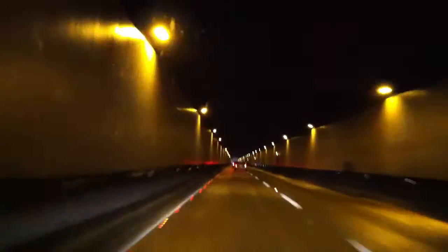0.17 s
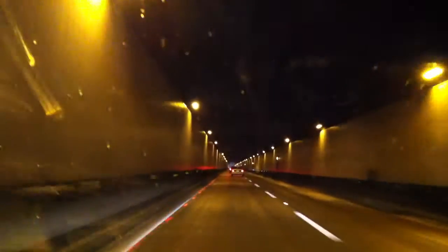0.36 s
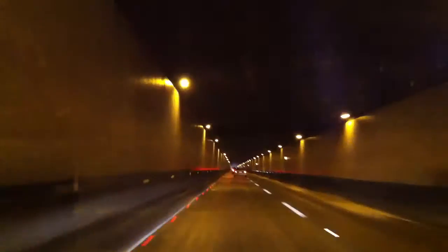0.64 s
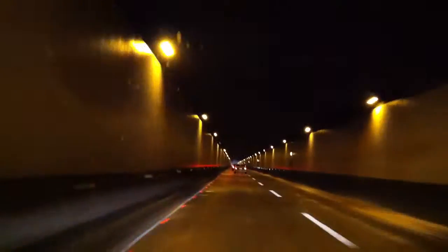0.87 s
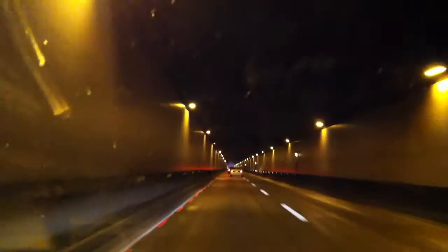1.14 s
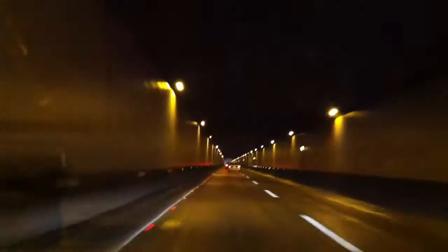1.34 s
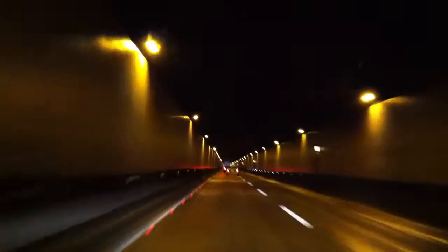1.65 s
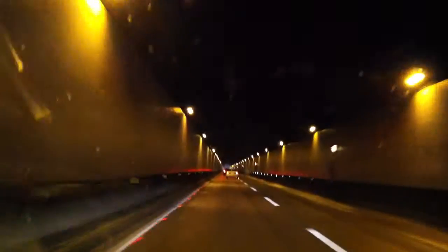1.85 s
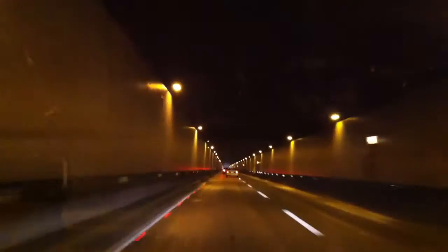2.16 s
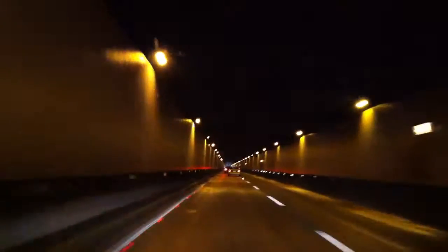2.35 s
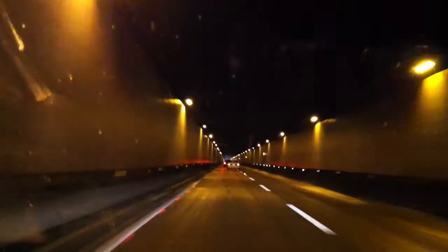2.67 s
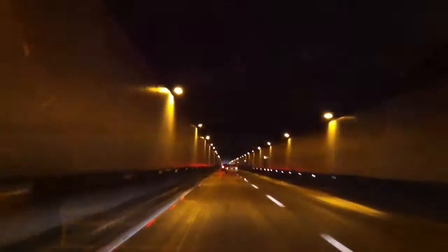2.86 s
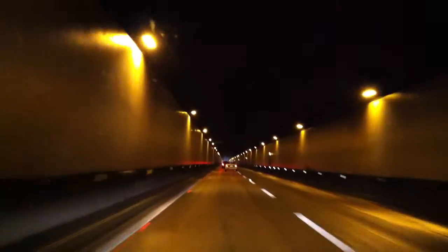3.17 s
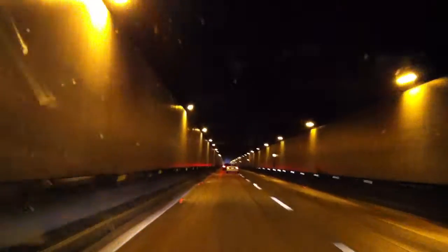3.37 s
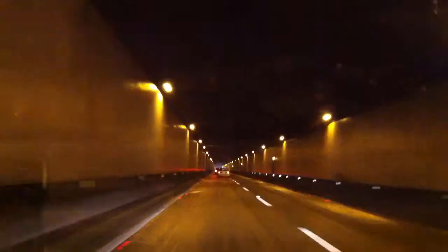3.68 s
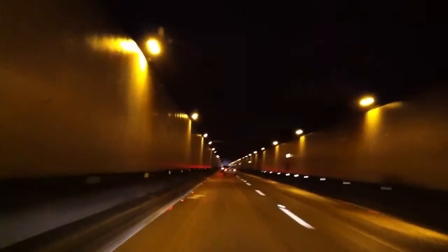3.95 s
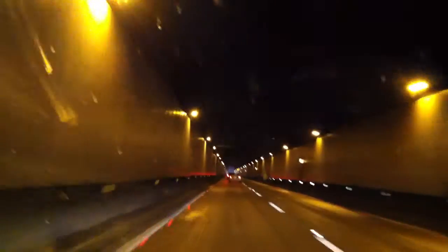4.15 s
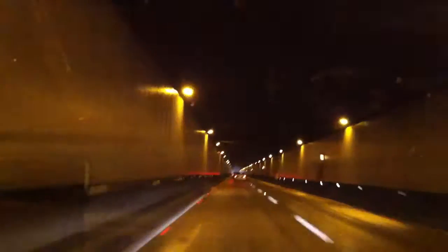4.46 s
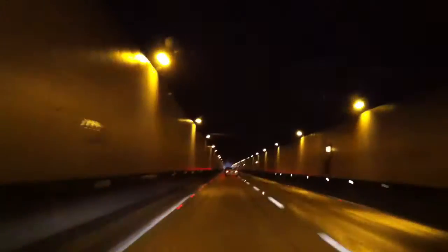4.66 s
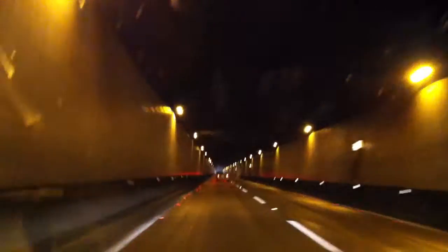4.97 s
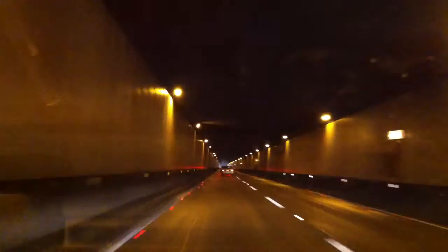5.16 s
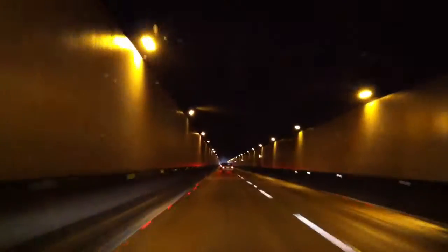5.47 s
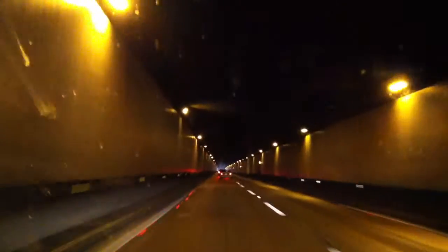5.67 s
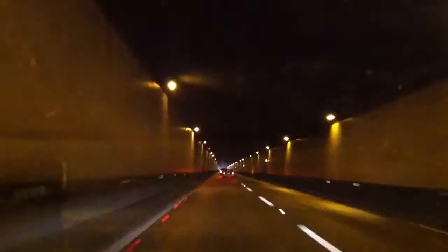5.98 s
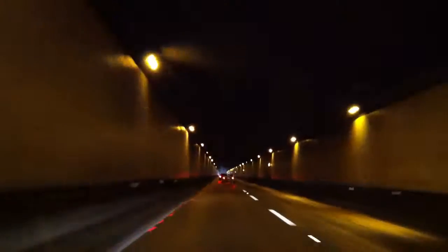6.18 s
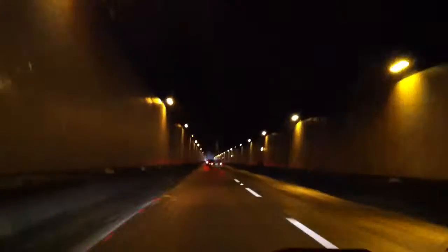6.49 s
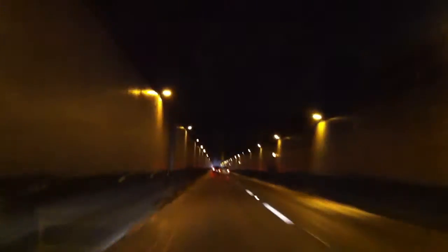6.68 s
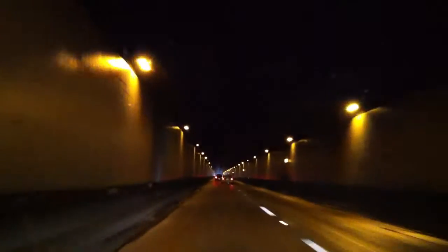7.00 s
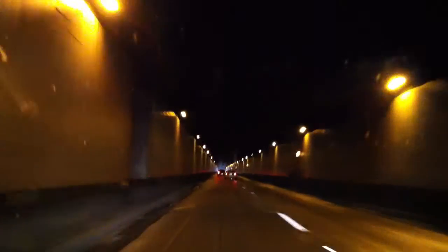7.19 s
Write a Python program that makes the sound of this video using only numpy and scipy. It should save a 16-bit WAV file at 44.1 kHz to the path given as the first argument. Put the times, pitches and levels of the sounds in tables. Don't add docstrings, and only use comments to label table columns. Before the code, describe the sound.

The inside of a car at steady speed in a road tunnel, captured close by a small microphone with little very deep bass. From the start a continuous low boom around 110 to 180 hertz fluctuates quickly with the road texture, blended with engine hum, rumble and muffled tyre roar. A faint, shaky gear whine near 1000 and 1300 hertz comes and goes in short spells, clearest in the early part. Small bumps swell the boom around 2 seconds, with nearly hidden trim ticks; firmer thuds follow at 2.45 and 2.6. Another dull joint lands at 3.8, then 4.25. The strongest cluster of thumps and tyre slaps comes from 4.9 to 5.05. More knocks follow at 5.8 and 6.3 to 6.4. Overall the rumble and roar soften very slightly, with faint airy hiss throughout, and the drive is still going when it stops at about 7.3.

```python
import sys
import numpy as np
from scipy import signal
from scipy.fft import rfft, irfft, next_fast_len
from scipy.io import wavfile
from scipy.ndimage import uniform_filter1d, map_coordinates

SR = 44100
rng = np.random.default_rng(int(sys.argv[2]) if len(sys.argv) > 2 else 0)


def attenuation_scalar(level_db):
    decades = np.asarray(level_db, float) / 20
    return 10 ** decades


def int16_out(signal):
    q = np.round(np.clip(np.atleast_2d(signal).T, -1, 1) * 32767)
    wavfile.write(sys.argv[1], SR, q.astype(np.int16))


N = 323253
TIME = np.arange(N) / SR

# (frequency [Hz], density [dB per Hz])
RUMBLE_SPECTRUM = [(15, -69.5), (25, -37.5), (54, -28.5), (102, 5), (145, -0.5), (184, -6.5), (217, -10.5),
                   (246, -12.5), (406, -14.5), (480, -22), (700, -25.5), (910, -57.5), (1540, -120)]


def rms_one(x):
    return x / np.sqrt(np.mean(x ** 2) + 1e-20)


def in_time(rows):
    times, values = np.transpose(rows)
    return np.interp(TIME, times, values)


def drift(rate):
    knots = rng.standard_normal(400)
    return map_coordinates(knots, [TIME * rate], order=3)


def noise(gain_at):
    size = next_fast_len(N)
    hz = np.maximum(np.arange(size // 2 + 1) * SR / size, 1)
    white = rng.standard_normal(size)
    return rms_one(irfft(rfft(white) * gain_at(hz), size)[:N])


def modes(table, hz):
    return sum(attenuation_scalar(db) ** 2 / (1 + (2 * (hz - f) / width) ** 2) ** 2 for f, width, db in table)


def coloured(spectrum, peaks, low_hz, high_hz):
    f, db = np.transpose(spectrum)

    def gain(hz):
        edges = 1 / (1 + (low_hz / hz) ** 12) / (1 + (hz / high_hz) ** 12)
        smooth = attenuation_scalar(np.interp(np.log(hz), np.log(f), db))
        return smooth * np.sqrt(edges * (1 + modes(peaks, hz)))
    return noise(gain)


def evened(x, span_s):
    size = int(span_s * SR)
    power = uniform_filter1d(uniform_filter1d(x ** 2, size), size)
    return x / np.sqrt(power + 0.012)


def band_pass(x, order, low_hz, high_hz):
    sos = signal.butter(order, [low_hz, high_hz], "band", fs=SR, output="sos")
    return rms_one(signal.sosfilt(sos, x))


def burst(at_s, t60, rise_s):
    t = np.maximum(TIME - at_s, 0)
    shape = (1 - np.exp(-t / rise_s)) * attenuation_scalar(-60 * t / t60)
    return shape / shape.max()


def airflow():
    # (frequency [Hz], density [dB per Hz])
    hiss_spectrum = [(4500, 2), (5600, 1.5), (6300, 0), (8000, -1.5), (9800, -4), (11000, -10.5),
                     (12500, -16.5), (13500, -22), (15500, -27)]
    level_db = -69.5 - 0.1 * TIME + 0.3 * drift(8.0)
    return attenuation_scalar(level_db) * coloured(hiss_spectrum, [], 5500, 15600)


def deep_shake():
    return attenuation_scalar(-58.0) * coloured(RUMBLE_SPECTRUM, [], 22, 62)


def rustles():
    # (time [s], level [dB], decay t60 [s])
    crackles = [
        (2.07, -75, .08),
        (2.135, -72, .08),
        (2.168, -68, .08),
        (2.54, -74, .15),
        (4.19, -75, .3),
        (5.45, -77, 0.071),
    ]
    bright = band_pass(rng.standard_normal(N), 4, 6800, 11800)
    return bright * sum(attenuation_scalar(db) * burst(s, t60, rise_s=0.0089) for s, db, t60 in crackles)


def whine(hz, spells, waver, overtone_db, flutter_db):
    edge_s, idle_db = 0.0092, -59.5
    load = attenuation_scalar(idle_db)
    for start_s, length_s, db in spells:
        inside_s = np.minimum(TIME - start_s, start_s + length_s - TIME)
        load = load + attenuation_scalar(db) * np.clip(inside_s / edge_s + 0.5, 0, 1)
    phase = 2 * np.pi * np.cumsum(hz) / SR + waver * drift(20.0)
    flutter = attenuation_scalar(-3.5 + flutter_db * drift(9.0))
    return np.sqrt(2) * load * flutter * (np.sin(phase) + attenuation_scalar(overtone_db) * np.sin(2 * phase))


def gears(mesh_hz):
    # (start [s], length [s], whine level [dB])
    upper_load = [(0.095, 0.28, -42.5), (0.444, .12, -48), (0.684, 0.19, -43), (0.948, 0.21, -44),
                  (1.24, 0.4, -46.5), (1.896, 0.48, -49), (2.45, .5, -57), (4.144, .5, -47.5),
                  (4.4, 0.066, -40.5), (4.8, 0.29, -47.5), (5.106, 0.3, -41.5), (5.921, 0.59, -47)]
    # (start [s], length [s], whine level [dB])
    drive_load = [(0, .14, -41.5), (.25, 0.26, -55), (.55, 0.77, -46), (1.348, 0.27, -45), (1.9, 0.3, -55),
                  (2.18, 0.27, -42), (2.5, .48, -48), (3.05, 0.73, -51), (3.87, 0.084, -40),
                  (4.05, 0.13, -46), (4.4, .6, -53), (5.0, .45, -46), (5.45, .6, -44), (6.0, 0.25, -52),
                  (6.5, 0.44, -58), (7.28, .1, -44)]
    final_ratio = 0.7648
    upper = whine(mesh_hz, upper_load, 0.85, -20, 1.3)
    return upper + whine(final_ratio * mesh_hz, drive_load, 0.9, -30, 1.2)


def slaps():
    # (time [s], level [dB], centre [Hz], decay t60 [s])
    joints = [(.07, -38, 900, .14), (1.8, -38, 350, .12), (2.43, -31, 320, .14), (2.63, -36, 300, .1),
              (3.815, -35, 300, .12), (4.245, -36, 300, .1), (4.88, -38, 800, .16), (4.91, -34, 330, .12),
              (4.97, -37, 1200, .12), (5.358, -44, 1750, .12), (5.772, -33, 300, .16),
              (5.788, -35, 700, .1), (5.868, -39, 800, .1), (6.41, -33, 370, .14), (6.428, -32, 750, .12)]
    out, white = np.zeros(N), rng.standard_normal(N)
    for s, db, hz, t60 in joints:
        band = band_pass(white, 3, hz / 1.44, hz * 1.45)
        out += attenuation_scalar(db) * burst(s, t60, rise_s=0.008) * evened(band, span_s=0.012)
    return out


def roar(surface_db, shake_db):
    # (frequency [Hz], density [dB per Hz])
    roar_spectrum = [(330, -32), (560, 3.5), (653, -8.5), (799, -2), (887, -5), (1010, -1.5), (1240, -3.5),
                     (1300, -4), (1530, -7), (2600, -16), (5540, -30), (7200, -63), (12200, -120)]
    # (frequency [Hz], width [Hz], level above the roar [dB])
    tread_modes = [(763, 130, -3), (1014, 50, -2.5), (1127, 30, 0), (1183, 35, -0.5), (1880, 27, 4),
                   (2275, 250, 0.5), (2512, 110, 4), (2680, 130, 4), (2900, 170, 1.5)]
    level_db = -38.5 + 0.12 * surface_db + 0.06 * shake_db - 0.2133 * TIME + 0.3 * drift(9.0)
    return attenuation_scalar(level_db) * coloured(roar_spectrum, tread_modes, 628, 5060)


def rumble(surface_db, shake_db):
    # (frequency [Hz], width [Hz], level above the rumble [dB])
    panel_modes = [
        (249.4, 30, 2),
        (282, 4.1, -4.5),
        (406.3, 16, 4.5),
        (575, 24, -0.5),
    ]
    level_db = -32.5 + 0.19 * surface_db + 0.14 * shake_db - 0.38 * TIME
    return attenuation_scalar(level_db) * evened(coloured(RUMBLE_SPECTRUM, panel_modes, 215.0, 630), span_s=0.22)


def engine(shaft_hz, low_hz, high_hz):
    # (multiple of shaft speed [1], level [dB])
    orders = [(3, -48), (4, -35), (5, -32), (6, -34), (6.5, -43), (10, -52)]
    turn = 2 * np.pi * np.cumsum(shaft_hz) / SR
    hum = 0
    for k, db in orders:
        if low_hz < k * shaft_hz.mean() < high_hz:
            hum = hum + attenuation_scalar(db + 3.5 * drift(2.45)) * np.sin(k * turn + 0.7 * drift(3.0))
    return hum


def bumps_db(body_hz):
    # (time [s], level above even boom [dB], pitch [Hz], length [s])
    kicks = [(.03, 2, 148, 0.066), (0.202, 3, 148, 0.13), (0.383, 5, 178, 0.084), (0.663, 6, 172, 0.18),
             (0.867, 5, 114, 0.13), (1.13, 4, 145, .15), (1.409, 3.5, 163, 0.2), (1.89, 7.5, 159, 0.076),
             (1.98, 10, 117.9, 0.061), (2.114, 7.5, 148, 0.048), (2.5, 7.5, 160, 0.22),
             (2.57, 10.5, 140, .08), (2.79, 9.5, 136, .1), (3.06, 7.5, 164, 0.057), (3.28, 8, 114, 0.061),
             (3.453, 6, 131, .1), (3.685, 3, 176, 0.22), (4.424, 1.5, 140, .1), (4.846, 3.5, 115, .1),
             (5.19, 7.5, 130, 0.065), (5.476, 5.5, 160, 0.057), (6.034, 4.5, 141, 0.11),
             (6.23, 7, 140, 0.057), (6.53, 8, 123, 0.093), (6.773, 7, 120, 0.051), (7.029, 8.5, 133, 0.086),
             (7.3, 7.5, 148, 0.14)]
    # (time [s], drop below
    # even boom [dB], pitch [Hz], length [s])
    smooth_patches = [(.17, -2, 112, .08), (0.333, -1, 148, 0.084), (.51, 5.5, 148, 0.12),
                      (.66, 7, 112, 0.23), (.9, 16, 166, 0.089), (1.0, 2, 178, .1), (1.223, 9, 112, 0.42),
                      (1.68, 6, 178, 0.062), (2.38, 10, 150, 0.098), (2.6, -1, 178, 0.083),
                      (2.927, 9, 134, 0.27), (3.18, 9, 112, 0.11), (3.3, 7, 148, 0.21),
                      (3.465, 16, 178, 0.17), (3.89, 11, 125, .08), (4.08, 3, 178, 0.23),
                      (4.17, 13, 122, 0.089), (4.34, 14, 165, .06), (4.66, 8, 178, 0.17),
                      (4.622, 0.5, 112, 0.16), (4.862, 4.5, 178, .08), (5.06, 3, 148, .06),
                      (5.264, 6, 150, .12), (5.738, 4, 165, .07), (5.913, 2, 148, 0.066),
                      (6.397, -5, 148, 0.045), (6.812, 12, 148, 0.059), (6.9, 2, 112, .12),
                      (7.05, 5, 178, .2), (7.08, 9, 148, .08)]
    reach_hz = 13.9
    t = np.arange(0, N, 50) / SR

    def near(s, hz, length):
        return np.exp(-0.5 * ((hz - body_hz) / reach_hz) ** 2 - 11.0 * ((t - s) / length) ** 2)
    power = 1 + sum((attenuation_scalar(db) ** 2 - 1) * near(s, hz, length) for s, db, hz, length in kicks)
    quiet_db = sum(db * near(s, hz, length) for s, db, hz, length in smooth_patches)
    return np.interp(TIME, t, 10 * np.log10(np.maximum(power, 0.01)) - quiet_db)


def thuds(body):
    # (start [s], peak level [dB], pitch [Hz], length [s])
    hard_joints = [(2.45, -16, 130, .06), (2.58, -14, 118, .075), (3.79, -17, 115, .06),
                   (4.255, -14.5, 165, .035), (4.935, -11.5, 145, .04), (4.975, -16, 135, .045),
                   (5.04, -16, 122, .055), (5.78, -16.5, 152, .075), (6.315, -14, 140, .035),
                   (6.415, -16.5, 152, .065)]
    give_way = 0.7
    for s, db, hz, length in hard_joints:
        swing = np.sin(np.pi * np.clip((TIME - s + 0.004) / length, 0, 1))
        shape = np.sqrt(swing.clip(0))
        throb = attenuation_scalar(db) * shape * np.sin(2 * np.pi * hz * (TIME - s))
        body = body * (1 - give_way * shape) + throb
    return body


def boom(levels_db, shaft_hz):
    # (frequency [Hz], width [Hz], level [dB])
    lower_modes = [(78.7, 5.1, -17.5), (105.8, 10.4, -8.5), (115.3, 5.7, -3.5), (122, 5.6, -3)]
    # (frequency [Hz], width [Hz], level [dB])
    middle_modes = [(137.2, 23, -11.5), (148.5, 9.1, -2), (160, 16, -9)]
    # (frequency [Hz], width [Hz], level [dB])
    upper_modes = [(166, 8, -9), (178.1, 7.4, 1), (192.1, 6.2, -4)]
    groups = [(lower_modes, -30, 70, 132), (middle_modes, -30, 132, 166), (upper_modes, -32, 166, 320)]
    out = 0
    for level_db, (table, usual_db, low_hz, high_hz) in zip(levels_db, groups):
        shaken = noise(lambda hz: np.sqrt(modes(table, hz)))
        hum = engine(shaft_hz, low_hz, high_hz) / attenuation_scalar(usual_db)
        out = out + attenuation_scalar(level_db) * evened(shaken + hum, span_s=0.094)
    high_pass = signal.butter(6, 74, "high", fs=SR, output="sos")
    return signal.sosfilt(high_pass, thuds(out))


def scene():
    # (time [s], level [dB])
    surface = [(0, 1.5), (.6, 1.5), (1.3, 1.5), (2.0, 1), (2.7, -0.5), (2.95, -1), (3.6, 1.5), (4.0, -3),
               (4.4, 3), (4.68, -3), (4.9, 3.5), (5.25, -2.5), (5.5, 1), (6.1, 0), (6.5, 0.5), (6.9, 1),
               (7.33, -1)]
    # (time [s], pitch [Hz])
    speed = [(0, 1330), (1.6, 1338), (2.3, 1336), (4.3, 1324), (5.3, 1326), (6.5, 1329), (7.33, 1327)]
    surface_db, mesh_hz = in_time(surface), in_time(speed)
    teeth = 45
    even_db, body_hz = [-33, -30, -34], [112, 148, 178]

    kicks_db = [bumps_db(hz) for hz in body_hz]
    shake_db = uniform_filter1d(sum(kicks_db), size=SR // 10)
    boom_db = [db + surface_db + kick_db + 1.5 * drift(14.0) for db, kick_db in zip(even_db, kicks_db)]

    background = airflow() + deep_shake() + rustles() + gears(mesh_hz)
    tyres = slaps() + roar(surface_db, shake_db) + rumble(surface_db, shake_db)
    return (background + tyres + boom(boom_db, mesh_hz / teeth))[None]


def band_limit(x):
    return signal.sosfilt(signal.butter(12, 15800, fs=SR, output="sos"), x)


def record(dry):
    whistle_hz, whistle_db = 15000, -105
    whistle = attenuation_scalar(whistle_db) * np.sqrt(2) * np.sin(2 * np.pi * whistle_hz * TIME)
    opening = np.minimum(np.arange(N) / 60, 1)
    rounded = np.tanh(3 * dry) / 3
    return band_limit(rounded * opening + whistle)


dry = scene()
out = record(dry)
int16_out(out)
```